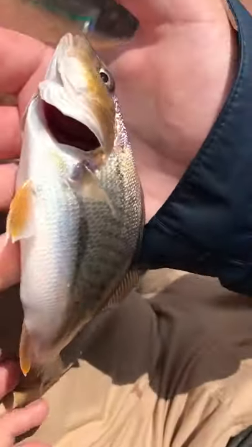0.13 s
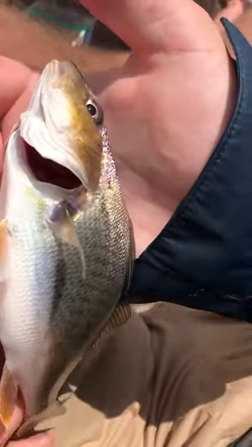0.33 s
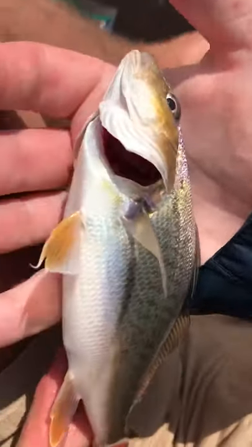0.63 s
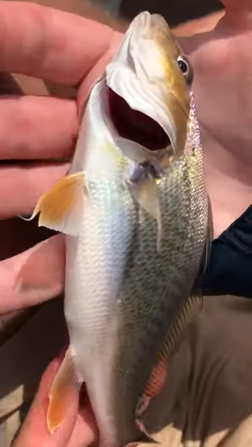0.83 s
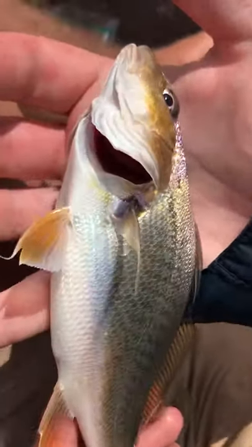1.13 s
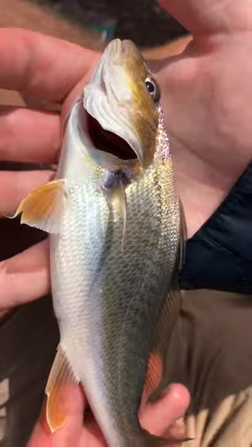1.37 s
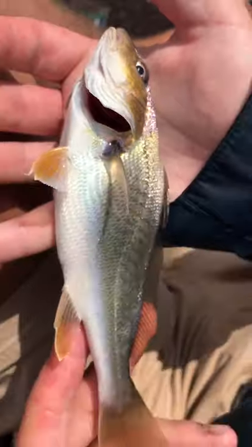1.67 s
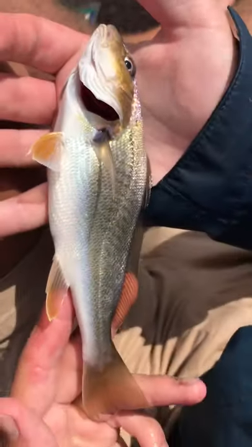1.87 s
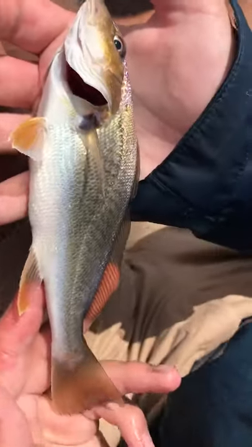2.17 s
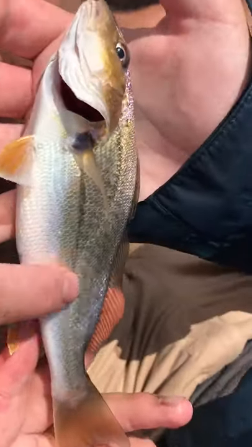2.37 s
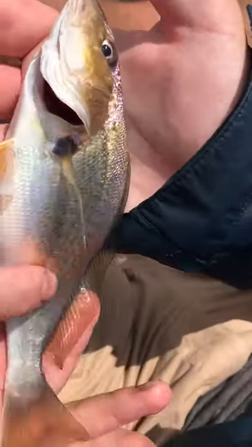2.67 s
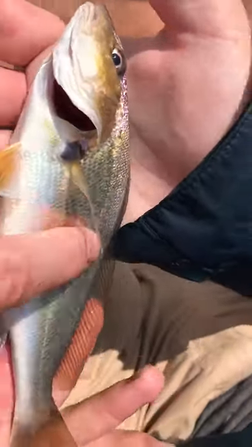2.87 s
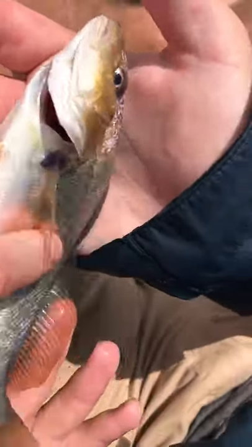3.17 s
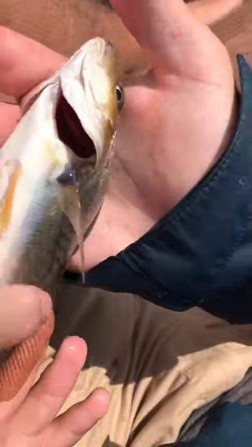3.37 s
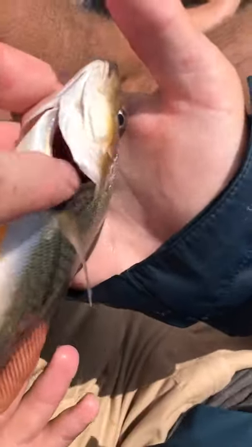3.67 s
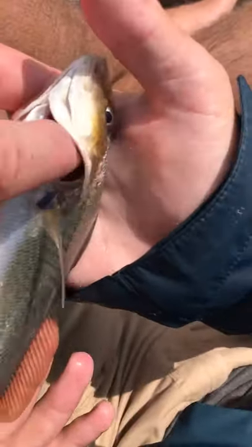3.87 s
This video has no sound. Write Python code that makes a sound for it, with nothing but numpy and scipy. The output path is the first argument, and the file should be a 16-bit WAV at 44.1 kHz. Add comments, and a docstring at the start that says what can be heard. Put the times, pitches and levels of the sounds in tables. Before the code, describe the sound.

A small fish held in the hand drums a rapid, hollow croak for the first second, close to a phone outdoors; gusty wind rumbles, flutters and crackles throughout, snapping harder near the end, with tiny wet ticks.

```python
"""A small fish held in the open air drums on its swim bladder for a second, close to a phone.
Each knock is a muscle twitch that rings the bladder and body, with a bright rim.
Gusty wind buffets the microphone throughout: shaped noise with rumble, flutter, crackle and snaps.
An insect chirps far off (rasped wing resonances) and wet fingers tick (ringing noise bursts).
Cloth rustles briefly; an outdoor wash and a faint hiss, both shaped noise, lie under all."""
import sys
import numpy as np
from scipy import signal
from scipy.fft import rfft, irfft
from scipy.io import wavfile
from scipy.ndimage import uniform_filter1d

SR = 44100
rng = np.random.default_rng(int(sys.argv[2]) if len(sys.argv) > 2 else 0)


def wrap_up_sound(samples):
    """Save the sound to the file named by the first command line argument, as 16-bit audio."""
    columns = np.atleast_2d(samples).T
    # keep every value between -1 and 1, then stretch to whole-number steps
    tamed = np.clip(columns, -1, 1)
    steps = np.round(tamed * 32767).astype(np.int16)
    wavfile.write(sys.argv[1], SR, steps)


N = 176400  # 4 s

# All levels are ahead of the phone's rounding; spectra are relative, as noise() sets rms 1.

# Knocks of the drumming muscle. Each entry: time in seconds.
KNOCK_TIMES_S = [0.0237, 0.0565, 0.0862, 0.1175, 0.1512, 0.1844, 0.2157, 0.2461, 0.2756, 0.3046, 0.3349,
                 0.3677, 0.4024, 0.434, 0.4669, 0.4979, 0.5302, 0.5628, 0.595, 0.6256, 0.6573, 0.6915,
                 0.7272, 0.7671, 0.8086, 0.8428, 0.8751, 0.9076, 0.9437, 0.9848]
# Resonances of bladder and body. Each row: centre in Hz, width in Hz, relative level in dB, signed gain.
BLADDER_MODES = [(327, 64, 3, 1), (660, 173, 3.5, -1.01), (1128, 360, 1.5, 0.91), (1660, 307, 4, -0.98)]
KNOCK_PEAK_DB, KNOCK_GROWTH_DB_PER_S = -15.5, 1.5  # at 0 s; without the rim
TWITCH_S = 0.001
# Bright rim of each knock, relative to the knock; level at 0 s.
RIM_HZ, RIM_WIDTH_HZ, RIM_DB, RIM_GROWTH_DB_PER_S = 2730, 820, -44, 8

# Wind bed under the gusts. Each row: time in seconds, nominal rumble level in dB, nominal flutter level in dB.
WIND_BED = [(0.0, -26, -25.5), (0.38, -39.5, -50.5), (0.42, -28.5, -41.5), (0.88, -30.5, -36.5),
            (1.05, -17, -46), (1.11, -48.5, -54.5), (1.41, -27.5, -39), (1.57, -40.5, -48.5),
            (2.12, -32.5, -50.5), (2.29, -26.5, -29.5), (2.39, -18, -31), (2.44, -28.5, -34.5),
            (2.96, -28, -23.5), (3.17, -28.5, -31.5), (4.0, -19.5, -27.5)]
# Gusts that slap the port. Each row: start in seconds, base level in dB, crackle level in dB,
# time from start to fall in seconds.
GUSTS = [(0.01, -11, -38, 0.019), (0.417, -14, -40.5, 0.036), (0.466, -21.5, -50, 0.047),
         (0.597, -13.5, -50, 0.02), (0.64, -15, -45, 0.015), (0.69, -14.5, -47, 0.024),
         (0.781, -5.5, -27.5, 0.015), (0.902, -20, -40.5, 0.045), (0.968, -18.5, -33.5, 0.039),
         (1.002, 2.5, -31, 0.012), (1.023, -6, -29.5, 0.022), (1.287, -20, -44, 0.042),
         (1.385, -14, -33.5, 0.02), (1.421, -10.5, -27.5, 0.031), (1.459, -18.5, -50, 0.027),
         (1.696, -20, -43, 0.036), (1.769, -27, -55.5, 0.05), (1.834, -27.5, -55.5, 0.039),
         (2.075, -19, -46, 0.054), (2.126, -7, -21.5, 0.027), (2.181, -10, -31.5, 0.022),
         (2.286, -25, -46, 0.044), (2.359, -19.5, -25.5, 0.043), (2.453, -36, -31.5, 0.025),
         (2.604, -11.5, -24.5, 0.025), (2.691, -13.5, -23, 0.012), (2.735, -13, -26, 0.016),
         (2.907, -21, -27, 0.014), (2.95, -14.5, -21, 0.023), (3.055, -16, -36.5, 0.014),
         (3.086, -17.5, -26, 0.027), (3.229, -24, -32, 0.018), (3.322, -15.5, -24, 0.03),
         (3.365, -13.5, -31, 0.037), (3.41, -13.5, -26, 0.023), (3.458, -18, -29, 0.018),
         (3.62, -24, -27.5, 0.023), (3.722, -8, -19, 0.031), (3.747, -10, -19.5, 0.021),
         (3.802, -9, -23, 0.024), (3.898, -21, -21.5, 0.02), (3.927, -21, -37, 0.058)]
# Snaps, single sharp eddies at the port. Each row: centre in seconds, peak in dB.
SNAPS = [(1.456, -27), (2.152, -17), (2.161, -22), (2.2, -32), (2.396, -23), (2.613, -20), (2.631, -24),
         (2.644, -27.5), (2.678, -28), (2.697, -27), (2.705, -24), (2.741, -28), (2.755, -29.5),
         (2.838, -31.5), (2.866, -27), (2.885, -8.5), (2.915, -31), (2.922, -29), (2.959, -9),
         (2.968, -18.5), (3.105, -24), (3.244, -25), (3.328, -9.5), (3.347, -27), (3.367, -29),
         (3.386, -22), (3.392, -23), (3.412, -14), (3.428, -15.5), (3.473, -21.5), (3.508, -25),
         (3.523, -25.5), (3.628, -21), (3.669, -20), (3.696, -15.5), (3.736, -18), (3.748, -7),
         (3.765, -1.5), (3.809, -16), (3.819, -11), (3.83, -7), (3.911, -11.5), (3.949, -12.5)]
# Spectrum of the deep rumble. Each row: frequency in Hz, relative density in dB per Hz.
RUMBLE_SPECTRUM = [(20, -36), (42, 4.5), (65, 12.5), (400, -21.5), (560, -64.5)]
# Spectrum of the flutter. Each row: frequency in Hz, relative density in dB per Hz.
FLUTTER_SPECTRUM = [(80, 0), (180, 6), (400, -6.5), (700, -34.5), (1400, -47.5), (3000, -88.5)]
# Spectrum of the crackle. Each row: frequency in Hz, relative density in dB per Hz.
CRACKLE_SPECTRUM = [(250, 5), (550, 9), (1000, -8), (1600, -31.5), (2500, -62), (5000, -99)]
# Spectrum of snaps and grains. Each row: frequency in Hz, relative density in dB per Hz.
SNAP_SPECTRUM = [(100, -7.5), (350, 8.5), (800, 8.5), (1300, 1), (2200, -22), (3500, -45.5), (7000, -72)]
GUST_RISE_S, SNAP_BURST_S = 0.0073, 0.0041
GUST_RUMBLE_DB, GUST_FLUTTER_DB = -17, -10  # relative to the gust's base level
BED_CRACKLE_DB, GRAIN_DB = -15, -16  # relative to bed flutter; to gust crackle
RUMBLE_SPREAD_DB, FLUTTER_SPREAD_DB, GRAIN_SPREAD_DB = 5, 4, 6.4
CRACKLE_SHARED_SPREAD_DB, CRACKLE_OWN_SPREAD_DB = 4.08, 4.908

# Wing resonances, the low band first, then two that form the high band.
# Each row: centre in Hz, width in Hz, relative level in dB (matters within the high band only).
WING_MODES = [(7280, 1300, 0), (8380, 600, 0.5), (9130, 730, -3)]
# Evenly spaced chirps. Each row: low band level in dB, high band level in dB.
CHIRP_LEVELS_DB = [(-72, -67.5), (-66, -68.5), (-66, -66), (-62, -60), (-65, -60.5), (-62, -60.5),
                   (-61.5, -61), (-66, -62), (-69, -63), (-72, -66.5), (-66, -68.5), (-69.5, -71),
                   (-68, -71), (-70, -69)]
CHIRP_FIRST_S, CHIRP_EVERY_S = 0.4555, 0.2635
CHIRP_RISE_S, CHIRP_FALL_START_S, CHIRP_FALL_S = 0.037, 0.13, 0.005

# Wet ticks of fingers and scales. Each row: start in seconds, nominal level in dB, centre in Hz, width in Hz.
TICKS = [(0.92, -41, 4360, 2500), (.988, -40.5, 3050, 700), (1.114, -48, 2770, 3000),
         (2.828, -44, 14200, 5000), (2.755, -50, 3000, 1500), (3.166, -50, 12000, 8000),
         (3.322, -41, 10500, 8850), (3.554, -49.5, 8200, 600), (3.722, -52.5, 4970, 2020)]
TICK_RISE_S, TICK_FALL_START_S, TICK_DECAY_S = 0.00018, 0.00047, 0.0028

# Brief rustles of cloth. Each row: start in seconds, length setting in seconds, level in dB.
RUSTLES = [(0.074, 0.14, -52.5), (0.253, 0.3, -60)]
# Spectrum of cloth. Each row: frequency in Hz, relative density in dB per Hz.
RUSTLE_SPECTRUM = [(2000, 2.5), (3500, -6), (8000, -2.5), (10500, -9), (13000, -11), (16000, -24)]
# Spectrum of the distant outdoor wash. Each row: frequency in Hz, relative density in dB per Hz.
AIR_SPECTRUM = [(200, -13), (500, -26.5), (1000, -3), (2000, -12), (3200, -23.5), (6000, -53)]
# Spectrum of the microphone hiss. Each row: frequency in Hz, relative density in dB per Hz.
HISS_SPECTRUM = [(2000, -7), (3000, -2.5), (5000, -6.5), (7500, -4.5), (10500, -12.5), (12500, -8),
                 (16000, -14)]
# Course of the hiss. Each row: time in seconds, level in dB.
HISS_LEVEL = [(0, -60), (.5, -67.5), (.8, -67.5), (1.3, -64.5), (1.9, -63.5), (2.1, -67), (2.4, -64),
              (4, -67.5)]
AIR_DB, AIR_SPREAD_DB = -64.5, 1.4
TOP_HZ = 15800


def undb(db):
    """Amplitude factor of a level in dB."""
    return 10 ** (np.asarray(db, float) / 20)


def curve(table, col):
    """One column of a table, interpolated over time."""
    rows = np.array(table, float)
    return np.interp(np.arange(N) / SR, rows[:, 0], rows[:, col])


def noise(points):
    """Noise of rms 1 with a spectrum of (Hz, dB) points, interpolated over log frequency."""
    rows = np.array(points, float)
    hz = np.maximum(np.arange(N // 2 + 1) * SR / N, 1)
    gain = undb(np.interp(np.log(hz), np.log(rows[:, 0]), rows[:, 1]))
    x = irfft(rfft(rng.standard_normal(N)) * gain, N)
    return x / x.std()


def ring(x, hz, width_hz):
    """Resonance with gain 1 at its centre."""
    return signal.lfilter(*signal.iirpeak(hz, hz / width_hz, fs=SR), x)


def walk(rate_hz):
    """Random levels held 1 / rate s and smoothed; spread 1."""
    hold = int(SR / rate_hz)
    steps = np.repeat(rng.standard_normal(N // 50), hold)[:N]
    w = uniform_filter1d(steps, hold)
    return w / w.std()


def swell(start_s, rise_s, fall_start_s, fall_s):
    """Linear rise, hold, exponential fall; fall_start_s counts from the start."""
    t = np.arange(N) / SR - start_s
    return np.clip(t / rise_s, 0, 1) * np.exp(-np.maximum(t - fall_start_s, 0) / fall_s)


def fish():
    """Each twitch jolts the bladder, which rings for a few milliseconds; a bright rim follows."""
    t = np.arange(1024) / SR
    twitch = np.sin(np.pi * np.clip(t / TWITCH_S, 0, 1)) ** 2
    jolt = np.gradient(twitch)
    knock = sum(sign * undb(db) * ring(jolt, hz, w) for hz, w, db, sign in BLADDER_MODES)
    knock /= np.abs(knock).max()
    beats = np.zeros(N)
    for s in KNOCK_TIMES_S:
        beats[int(s * SR)] = undb(KNOCK_PEAK_DB + KNOCK_GROWTH_DB_PER_S * s)
    rim_gain = undb(RIM_DB + RIM_GROWTH_DB_PER_S * np.arange(N) / SR)
    rim = np.roll(beats, int(TWITCH_S * SR)) * rim_gain * SR / RIM_WIDTH_HZ
    for _ in range(3):
        rim = ring(rim, RIM_HZ, RIM_WIDTH_HZ)
    return np.convolve(beats, knock)[:N] + rim


def wind_snaps(air):
    """Single sharp eddies: short noise bursts through a pulse with the spectrum of air."""
    k = int(SNAP_BURST_S * SR)
    white = rng.standard_normal(N)
    pulse = np.roll(irfft(np.abs(rfft(air)), N), 256)[:512] * np.hanning(512)
    snaps = np.zeros(N)
    for s, db in SNAPS:
        i = int((s - SNAP_BURST_S / 2) * SR)
        piece = np.convolve(white[i:i + k] * np.hanning(k), pulse)
        snaps[i - 256:i + k + 255] += piece * undb(db) / np.abs(piece).max()
    return snaps


def wind():
    """Turbulence at the port: rumble, patchy flutter and grainy crackle swell in gusts; snaps on top."""
    slaps = [swell(s, GUST_RISE_S, length, length / 3) for s, _, _, length in GUSTS]
    gust = sum(undb(row[1]) * slap for row, slap in zip(GUSTS, slaps))
    grit = sum(undb(row[2]) * slap for row, slap in zip(GUSTS, slaps))
    bed = undb(curve(WIND_BED, 2))
    shared = walk(110)  # patchiness common to flutter and crackle

    rumble_bed = undb(curve(WIND_BED, 1) + RUMBLE_SPREAD_DB * walk(28))
    rumble = noise(RUMBLE_SPECTRUM) * (rumble_bed + undb(GUST_RUMBLE_DB) * gust)

    flutter = noise(FLUTTER_SPECTRUM) * (bed + undb(GUST_FLUTTER_DB) * gust)
    flutter *= undb(FLUTTER_SPREAD_DB * shared)

    crackle = noise(CRACKLE_SPECTRUM) * (undb(BED_CRACKLE_DB) * bed + grit)
    crackle *= undb(CRACKLE_SHARED_SPREAD_DB * shared + CRACKLE_OWN_SPREAD_DB * walk(260))

    air = noise(SNAP_SPECTRUM)
    grain_gain = undb(GRAIN_DB + GRAIN_SPREAD_DB * np.clip(walk(300), -2, 2))
    grains = np.roll(air, N // 2) * grit * grain_gain
    return rumble + flutter + crackle + wind_snaps(air) + grains


def insect():
    """A rasp rings two wing bands in evenly spaced chirps; their balance changes from chirp to chirp."""
    rasp = rng.standard_normal(N)
    bands = []
    for hz, w, db in WING_MODES:
        gain = undb(db + 2.2 * walk(25.14) + 2.2 * walk(4.98))
        bands.append(gain * ring(ring(rasp, hz, w), hz, w))
    low, high = bands[0], sum(bands[1:])
    starts_s = [CHIRP_FIRST_S + k * CHIRP_EVERY_S for k in range(len(CHIRP_LEVELS_DB))]
    shapes = np.array([swell(s, CHIRP_RISE_S, CHIRP_FALL_START_S, CHIRP_FALL_S) for s in starts_s])
    low_level, high_level = undb(CHIRP_LEVELS_DB).T @ shapes
    return low / low.std() * low_level + high / high.std() * high_level


def ticks():
    """Wet contacts: tiny bursts of noise, each rung at its own colour."""
    white = rng.standard_normal(N)
    total = np.zeros(N)
    for s, db, hz, w in TICKS:
        burst = white * swell(s, TICK_RISE_S, TICK_FALL_START_S, TICK_DECAY_S)
        bandwidth_gain = np.sqrt(SR / w / 4)  # offsets the loss in a narrow band
        total += undb(db) * ring(ring(burst, hz, w), hz, w) * bandwidth_gain
    return total


def cloth():
    """Rustling friction: shaped noise in brief swells."""
    level = sum(undb(db) * swell(s, 0.037, length / 2, length / 3) for s, length, db in RUSTLES)
    return level * noise(RUSTLE_SPECTRUM)


def outdoor_wash():
    """Distant outdoor air: shaped noise that wavers slightly."""
    return undb(AIR_DB + AIR_SPREAD_DB * walk(9.07)) * noise(AIR_SPECTRUM)


def hiss():
    """Microphone hiss: shaped noise with a slowly varying level."""
    return undb(curve(HISS_LEVEL, 1)) * noise(HISS_SPECTRUM)


def scene():
    """Sum of all sources, one channel."""
    return (fish() + wind() + insect() + ticks() + cloth() + outdoor_wash() + hiss())[None]


def record(dry):
    """The phone rounds the loudest peaks and cuts the top."""
    rounded = np.tanh(0.95 * dry) / 1.224
    low_pass = signal.ellip(10, 0.2, 80, TOP_HZ, fs=SR, output="sos")
    return signal.sosfilt(low_pass, rounded)


dry = scene()
out = record(dry)
wrap_up_sound(out)
```